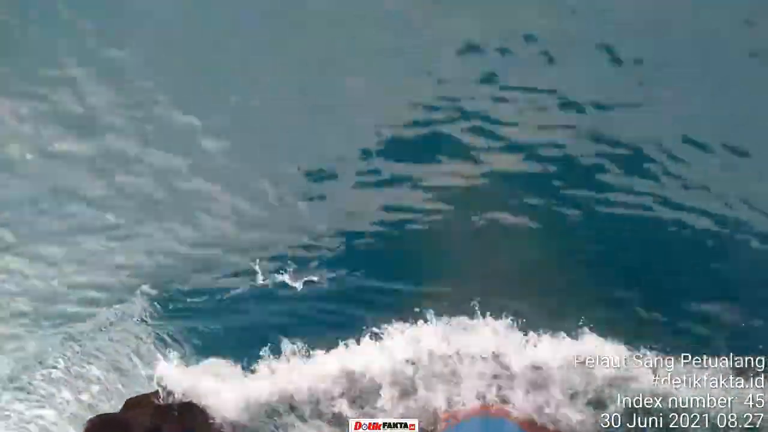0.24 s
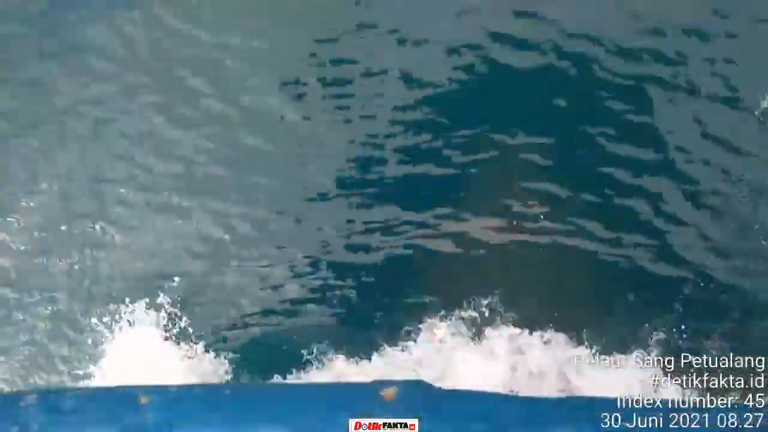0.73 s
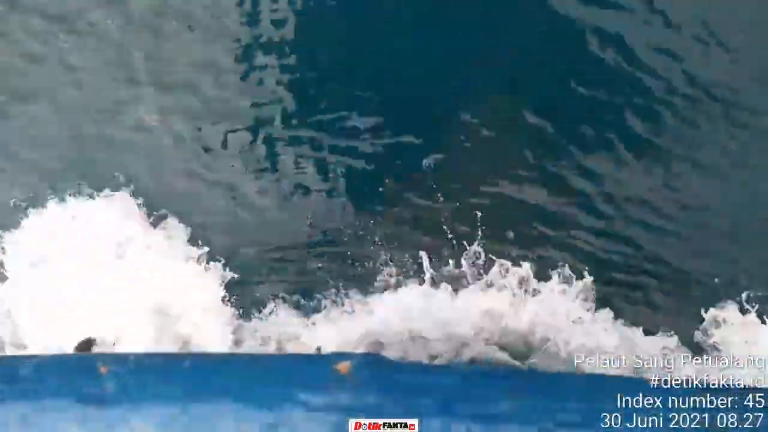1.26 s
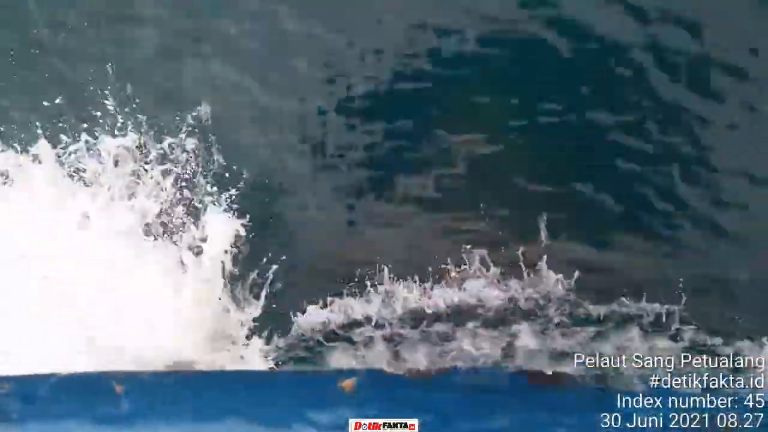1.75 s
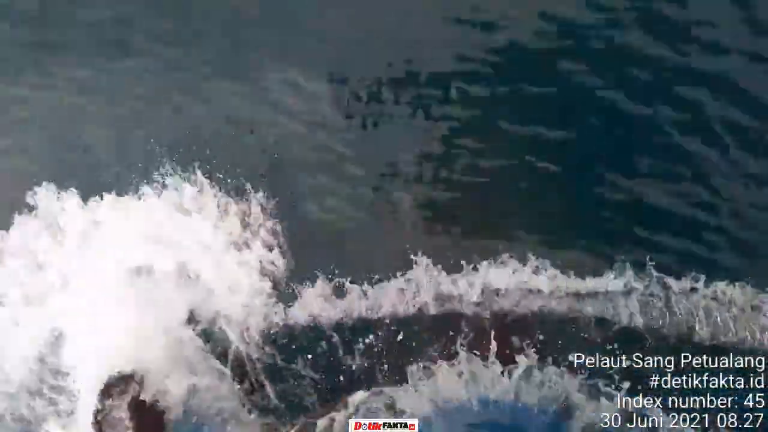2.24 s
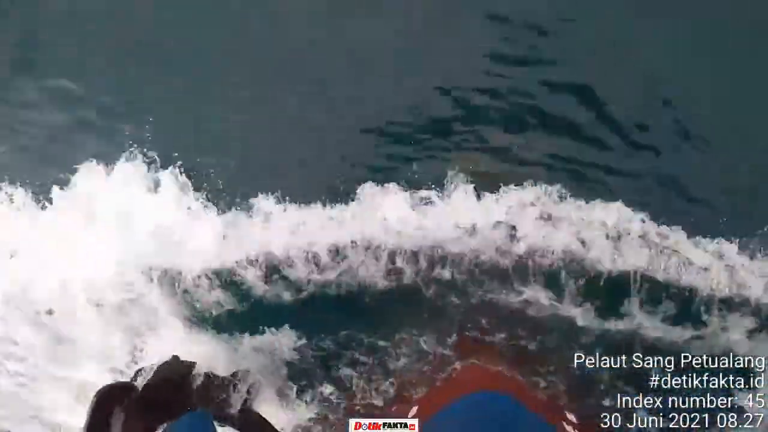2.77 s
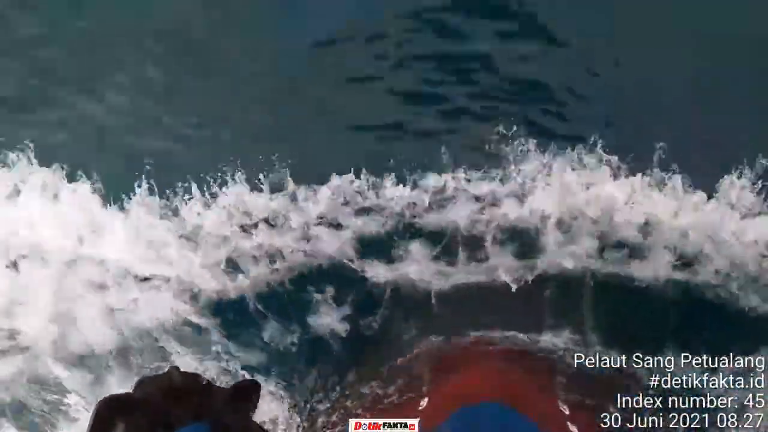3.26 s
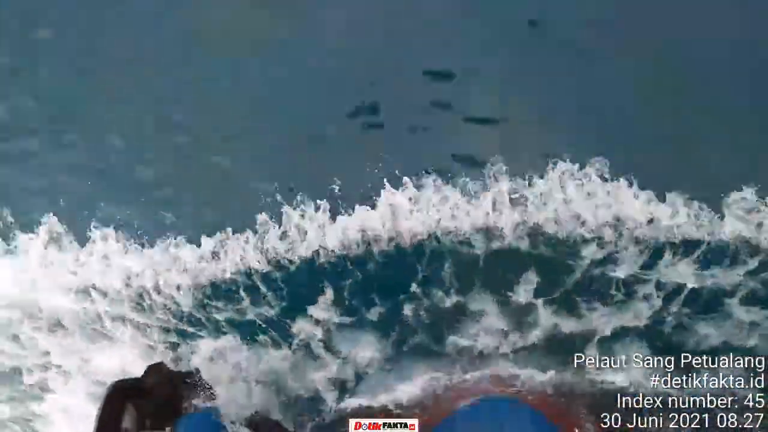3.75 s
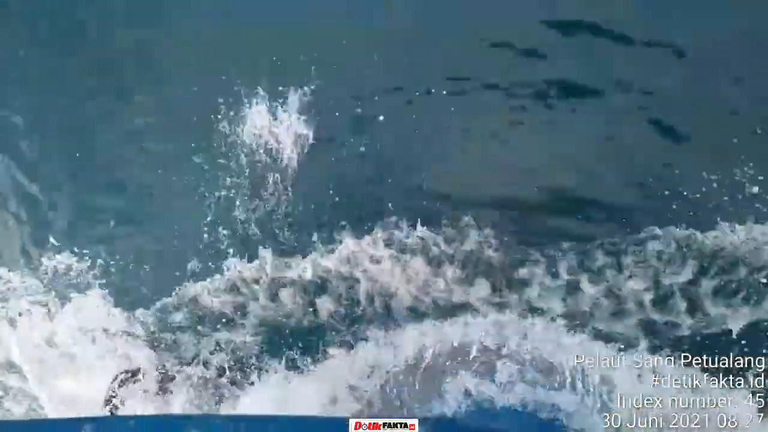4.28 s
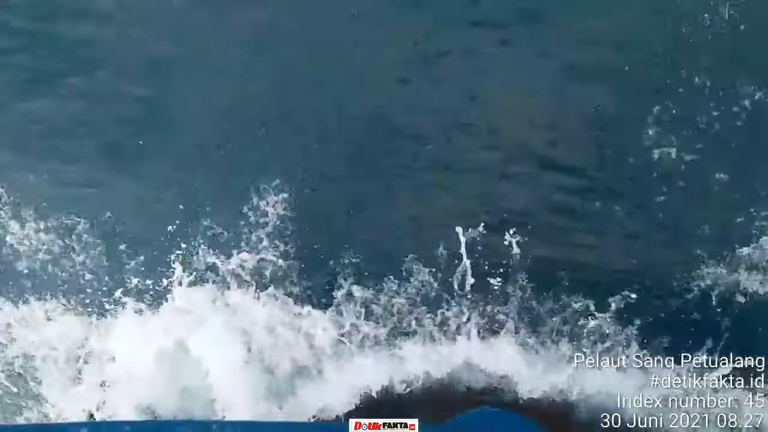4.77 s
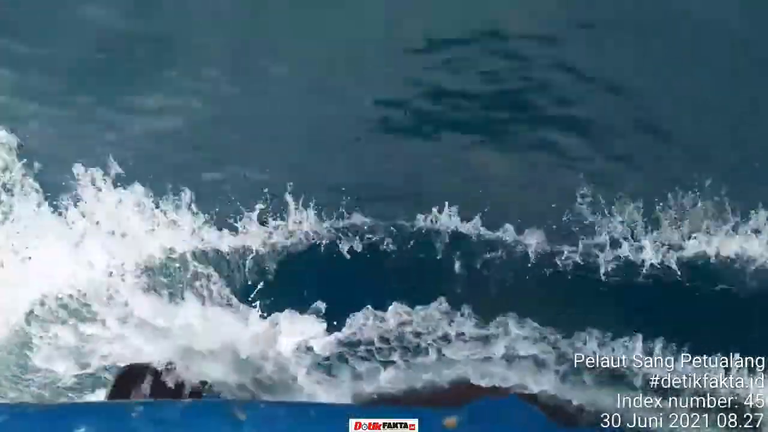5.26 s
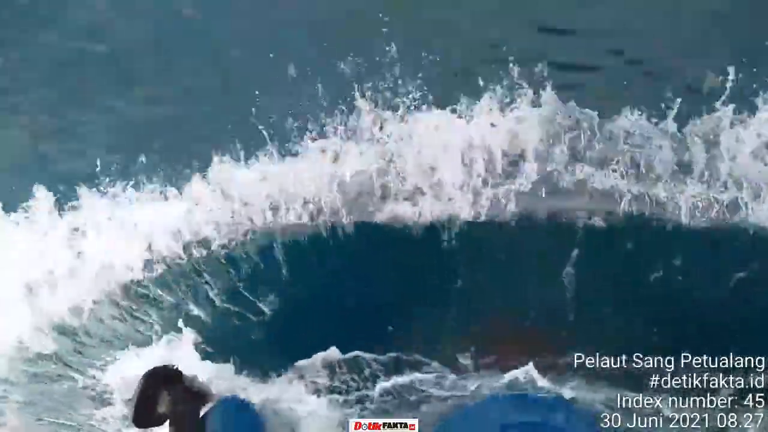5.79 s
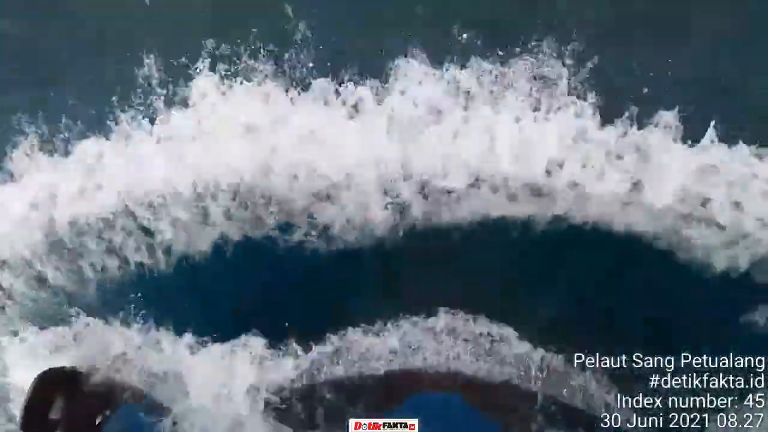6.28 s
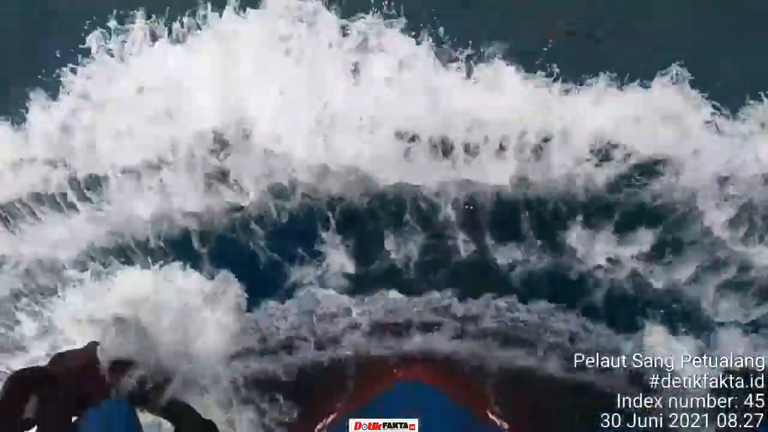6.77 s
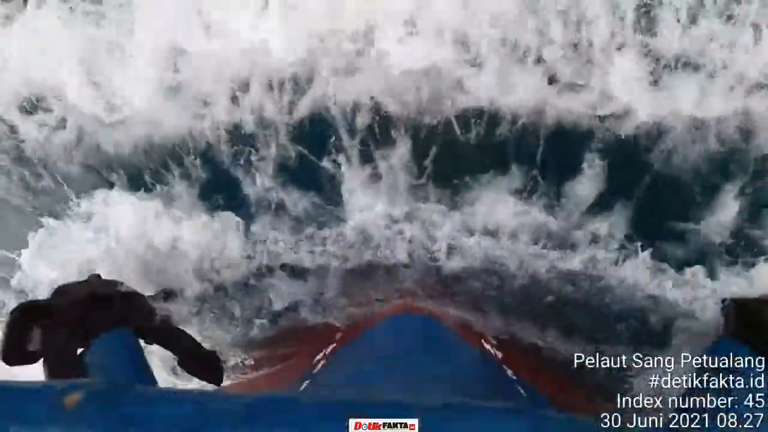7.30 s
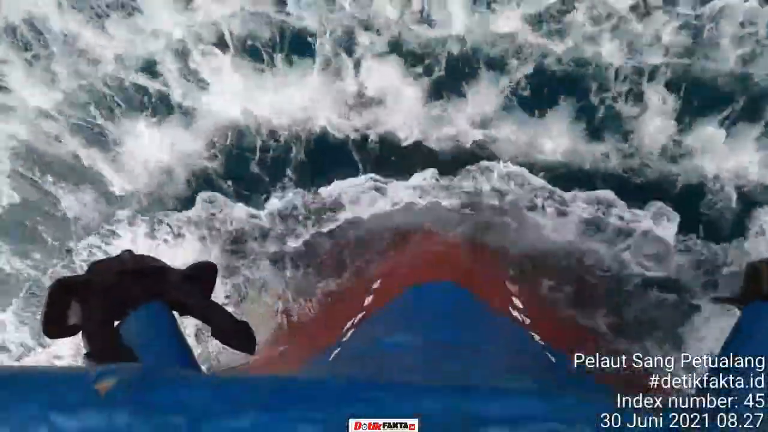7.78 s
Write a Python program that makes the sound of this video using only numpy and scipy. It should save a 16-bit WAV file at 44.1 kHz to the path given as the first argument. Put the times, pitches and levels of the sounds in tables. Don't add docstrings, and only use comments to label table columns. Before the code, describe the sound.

Outdoors at a ship's bow, heard from the rail above the water. Throughout, foamy seawater churns and rushes, mostly low-middle slosh with softer spray hiss, flecked with bubbles and plops. Wind presses on the microphone as deep uneven rumble, thuds and flaps; a steady low engine hum lies below. At about 1 s a round gulp stands out; the wash swells near 1.2 s and again by 3 s. Sharp buffets thump from 2.8 to 3.5 s, then water and wind ease, leaving clustered gurgles at 3.7-3.9 s. Water surges from 4.3 s, with buffets around 4.5 s and tiny drops on the rail. Near 5.2 s a small metal fitting rattles briefly, high and faint. Spray is fullest and brightest around 6 s, gulping until 6.7 s. From 7.6 s the wash thins while strong buffets thud and a fainter metallic chatter returns.

```python
import sys
import numpy as np
from scipy import signal
from scipy.fft import rfft, irfft
from scipy.io import wavfile
from scipy.ndimage import uniform_filter1d

SR = 44100
rng = np.random.default_rng(int(sys.argv[2]) if len(sys.argv) > 2 else 0)


def wav_out(sig):
    wavfile.write(sys.argv[1], SR, np.round(np.clip(np.atleast_2d(sig).T, -1, 1) * 32767).astype(np.int16))


def ratio_of_db(decibels):
    return 10 ** (np.asarray(decibels, float) / 20)


N = 354110

# [t/s, vigour/dB, fineness/dB]
BOW_DRIVE = [(0.0, -3, -0.8), (0.35, -0.7, -0.8), (0.85, -1, -1.2), (1.2, 1, -0.5), (1.7, -2.5, -1),
             (2.25, -0.5, -1.5), (3.0, 0.55, -0.4), (3.3, -3.5, 0.8), (3.6, -5, 0.1), (4.1, -2, -0.5),
             (4.45, 1.5, -0.4), (5.0, -0.1, -1.4), (5.55, -1, 1.8), (5.95, 2, 2), (6.75, 0, 1.1),
             (7.1, 1, 1.5), (7.6, -2.5, 1.2), (8.03, -4.5, 2.5)]
# [f/Hz, density/dB per Hz]
WATER_COLOUR = [(120, -13), (200, 0), (250, -0.5), (430, 2.5), (630, 0), (780, -8.5), (1320, -9.5),
                (1480, -12), (2700, -13.5), (3300, -17.5), (4200, -30), (5900, -27), (7500, -41.5),
                (10000, -49.5), (13000, -66)]
WATER_SPLITS = [740, 1700, 3900, 7300]
# [centre f/Hz, usual level/dB, share of vigour/1, share of fineness/1]
WATER_RANGES = [
    (450, -43.5, 1.12, -1.15),
    (1100, -50, 1.1, -0.36),
    (2600, -50, 1.23, -0.08),
    (5400, -64, 1.28, 0.95),
    (9000, -78.5, 1.6, 2),
]
# [t/s, surge level/dB, half length/s, splash centre f/Hz]
CRESTS = [(0.19, 5.5, 0.033, 1500), (0.66, 3.5, 0.04, 12000), (1.003, 2.5, 0.05, 7000),
          (1.06, 3, 0.042, 450), (1.433, 2.5, 0.095, 1500), (1.874, 3, 0.12, 12000), (2.072, 6, 0.11, 7000),
          (2.643, 4, 0.064, 12100), (3.07, 2.5, 0.13, 2500), (3.47, 3.5, 0.036, 450),
          (3.684, 5, 0.042, 4000), (3.88, 7.5, 0.09, 1490), (4.284, 2, 0.08, 7000), (4.6, 4, 0.073, 12000),
          (4.737, 7, 0.093, 12000), (4.812, 2.5, 0.04, 12000), (5.05, 2.6, 0.075, 1500),
          (5.224, 5.5, 0.095, 250), (5.22, 6, 0.064, 12000), (5.32, 2.5, 0.06, 12000),
          (5.93, 2, 0.04, 12000), (6.42, 3, 0.28, 800), (6.96, 2.5, 0.15, 12000), (7.016, 3.5, 0.11, 250),
          (7.41, 2, 0.04, 250), (7.67, 6, 0.027, 250), (7.762, 2.5, 0.06, 12000), (7.9, 4, 0.098, 250)]
CREST_OCTAVES = 2.33
# [t/s, level change/dB, half length/s, centre f/Hz]
SMALL_SURGES = [(0.38, -5, 0.044, 350), (0.469, 2.0, 0.035, 2600), (0.8, 6, 0.018, 350), (0.888, -3, 0.035, 1100),
                (1.098, 2, 0.06, 4000), (1.213, -3.5, 0.048, 600), (1.616, 2.5, 0.02, 1100),
                (1.796, 3.5, 0.032, 5400), (1.946, -1, 0.17, 350), (2.135, 1, 0.039, 1700),
                (2.373, 2.5, 0.06, 1700), (3.352, -3, 0.24, 350), (3.402, 2.5, 0.16, 2600),
                (3.624, -3.5, 0.032, 600), (3.854, -4, 0.092, 350), (3.895, -6, 0.017, 1690),
                (4.104, -4, 0.029, 600), (4.77, -5.5, 0.03, 350), (4.935, 2, 0.06, 1700), (5.248, -2, 0.11, 5400),
                (5.373, 3.1, 0.14, 1100), (5.567, -1.2, 0.14, 4000), (5.657, 2.3, 0.14, 1100),
                (6.685, 2, 0.02, 2600), (6.783, -1.7, 0.06, 1100), (6.866, 5.5, 0.024, 350),
                (7.713, -1.5, 0.035, 1100), (7.902, -2, 0.06, 1700), (8.022, 2.1, 0.16, 350),
                (2.52, -1, 0.09, 800), (2.78, -1, 0.08, 350), (4.47, 0, 0.06, 300), (1.32, 1, 0.095, 2600),
                (0.6, 1.5, 0.06, 300), (7.27, 0, 0.05, 350), (0.85, 0, 0.06, 2600), (4.66, 1, 0.03, 9000),
                (5.85, -1, 0.04, 9000), (6.05, -2, 0.04, 9000), (4.27, 0, 0.045, 350)]
SMALL_SURGE_OCTAVES = 1.08
# [t/s, peak level/dB, f/Hz]
GULPS = [(0.269, -30, 533), (0.394, -30, 517), (0.796, -31, 620), (1.006, -35, 412), (1.067, -20.5, 590),
         (1.625, -29, 537), (1.82, -28, 470), (2.691, -40, 490), (3.718, -29.5, 426), (3.803, -25, 610),
         (3.816, -27, 540), (3.842, -26.5, 610), (3.85, -29, 620), (3.895, -31, 460), (3.918, -24.5, 500),
         (4.6, -34, 1250), (3.812, -37, 1250), (3.897, -37, 1750), (3.872, -33, 880), (3.858, -38, 2650),
         (4.37, -28, 465), (4.413, -25.5, 584), (4.554, -24, 410), (5.286, -45, 655), (5.64, -43, 479),
         (6.108, -27.5, 580), (6.394, -26, 446), (6.447, -27, 646), (6.512, -26.5, 495), (6.545, -32, 475),
         (6.743, -35, 505), (7.024, -37, 423), (7.272, -48, 571), (7.434, -27, 510)]
# [t/s, peak level/dB, f/Hz]
GLUGS = [(0.105, -35, 366), (0.141, -28, 315), (0.461, -32, 390), (0.947, -31, 336), (0.978, -33, 506),
         (1.666, -34, 393), (2.662, -26, 487), (2.786, -32, 385), (3.007, -32, 455), (3.119, -36, 479),
         (4.227, -29, 393), (4.278, -30, 361), (4.591, -31, 376), (5.799, -39, 398), (5.859, -32, 423),
         (7.195, -31, 468), (7.403, -28, 519), (7.669, -34, 358), (7.905, -33, 463)]
# [t/s, peak level/dB, f/Hz]
PLOPS = [(0.2877, -39, 2340), (0.7627, -41, 2300), (0.7886, -36, 2730), (0.852, -37, 2470),
         (0.9453, -40, 2650), (1.9425, -35, 2430), (2.396, -40, 2470), (2.6673, -36, 1890),
         (3.0066, -37, 2030), (3.0749, -38, 1850), (3.8477, -33, 2320), (3.9669, -39, 1980),
         (4.3335, -38, 1950), (4.814, -35, 2690), (5.4844, -35, 1920), (5.7224, -39, 2090),
         (5.8611, -41, 2480), (5.9614, -31, 1900), (6.129, -36, 2140), (6.2377, -36, 2330),
         (6.5984, -37, 2640), (6.6578, -37, 2320), (6.7705, -37, 2060), (6.9321, -40, 2940),
         (7.1596, -36, 2510)]
# [f/Hz, width f/Hz, level/dB]
PORT_RESONANCE = (9000, 500, 3.6)
# [t/s, peak level/dB]
RAIL_DROPS = [(4.4994, -56), (4.5605, -46), (4.6194, -48), (4.703, -48), (4.7494, -49), (4.815, -46),
              (5.1694, -55), (5.9194, -49), (6.6862, -48)]

# [t/s, strength/dB, smallness of the eddies/dB]
WIND_DRIVE = [(0.0, -2, -1.5), (0.6, -2.5, 2.2), (0.8, 1.5, -5), (1.5, 0.5, -0.5), (2.0, -1.1, -2),
              (2.45, 0.5, 2), (3.2, -4.5, -0.5), (3.6, -12.5, 0), (4.25, -0.5, 1.8), (4.65, 2.6, -2.5),
              (5.1, -2, 7), (5.7, -2.5, 5.5), (6.05, -4, 1.2), (6.5, 1, 1), (7.2, -5, 2), (7.6, -0.5, -0.5),
              (7.85, 5.0, -3.5), (8.03, 4.5, 2)]
# [centre passing rate f/Hz, usual level/dB, share of strength/1, share of smallness/1]
EDDY_SIZES = [
    (12, -30, 1.13, -0.68),
    (51.5, -40.5, 1.14, 0.75),
    (133, -47, 0.95, 0.91),
]
# [f/Hz, density/dB per Hz]
PRESSURE_COLOUR = [(2, -2), (5, 8), (10, 7), (20, -3), (32, -7.5), (60, -33), (200, -74), (1500, -140)]
# [f/Hz, density/dB per Hz]
THUD_COLOUR = [(15, -45), (36, -2.5), (65, -9.5), (95, -12.5), (160, -34.5), (1500, -140)]
# [f/Hz, density/dB per Hz]
FLAP_COLOUR = [(40, -42), (95, -3.5), (140, -2), (220, -8), (400, -21), (800, -40), (4000, -140)]
# [t/s, level change/dB, half length/s, centre f/Hz]
WIND_SURGES = [(0.397, 6, 0.076, 15), (1.423, 10, 0.09, 26), (1.882, 9, 0.029, 180), (2.66, 11, 0.034, 22),
               (2.817, 12.5, 0.043, 69), (2.977, 15, 0.047, 10), (3.015, 11.5, 0.057, 170),
               (3.044, 24, 0.029, 30), (3.123, 1.5, 0.035, 120), (3.3, 14, 0.029, 37), (3.405, 9, 0.034, 8),
               (3.445, 17, 0.021, 160), (3.46, 26, 0.098, 26.5), (3.617, 13.5, 0.12, 53),
               (3.765, 22.5, 0.047, 28.6), (3.86, 12.1, 0.084, 8.9), (3.916, 11.5, 0.057, 160),
               (3.954, 12.5, 0.038, 19), (4.038, 7.5, 0.09, 49), (4.178, 10, 0.048, 23), (4.466, 8.5, 0.052, 140),
               (5.257, 9, 0.08, 36), (5.605, 10, 0.066, 36), (6.14, 13, 0.031, 44), (7.04, 6, 0.075, 80),
               (7.056, 12, 0.06, 7.9), (7.51, 16, 0.039, 7.4), (7.683, 10.5, 0.058, 39), (7.895, 8, 0.1, 43),
               (7.51, -3, 0.04, 50), (7.33, -2.5, 0.06, 70), (0.78, -2, 0.12, 27), (1.2, -2, 0.06, 70),
               (4.6, -2, 0.08, 40), (6.75, -1, 0.11, 25), (1.75, 2.5, 0.15, 23), (0.03, 3, 0.046, 60),
               (0.14, 0, 0.03, 50), (0.399, 4, 0.1, 80), (0.452, -16, 0.047, 200), (0.614, -5, 0.03, 62),
         (1.066, -7, 0.03, 64), (1.098, 5, 0.13, 200), (1.223, -10.9, 0.037, 57), (1.586, 1.5, 0.073, 64),
         (2.05, 3, 0.03, 110), (2.183, -10, 0.03, 35), (2.355, -12, 0.041, 33), (2.52, -7, 0.042, 72),
         (2.937, -10, 0.03, 42), (3.21, -1, 0.028, 50), (3.871, -4, 0.05, 30), (4.312, -11, 0.063, 200),
         (4.36, 2.5, 0.13, 30), (4.366, -11, 0.05, 8), (4.561, 11.5, 0.027, 200), (4.679, 0.5, 0.11, 200),
         (4.764, 4, 0.03, 30), (4.797, -5, 0.14, 8), (4.899, 5, 0.019, 46), (5.817, 4, 0.03, 33),
         (6.126, -14, 0.03, 8), (7.308, 14, 0.04, 26), (7.413, -8, 0.041, 220), (7.514, 2, 0.021, 200),
         (7.553, -2, 0.05, 50), (0.7, -7, 0.12, 40), (0.64, 5, 0.07, 200), (1.22, -3, 0.05, 90),
         (2.3, -1, 0.046, 100), (2.96, 3.5, 0.03, 110), (3.148, 5, 0.04, 92), (4.95, -4, 0.08, 64),
         (5.72, -2.5, 0.12, 35), (5.87, 4, 0.074, 200), (6.87, -5, 0.03, 140), (6.95, 4.5, 0.04, 92),
         (7.49, 2, 0.04, 99), (7.63, -5, 0.035, 45), (7.75, -3, 0.04, 60), (0.35, -2, 0.06, 55),
         (3.43, 5, 0.025, 200)]
WIND_SURGE_OCTAVES = 1.39
# [t/s, peak level/dB, f/Hz, length/s]
BUFFETS = [(2.797, -31, 71.6, 0.041), (2.981, -30, 89, 0.047), (3.034, -24.5, 76, 0.049),
           (3.419, -24, 100, 0.046), (4.418, -26, 72, 0.048), (4.543, -24, 74.7, 0.055),
           (5.512, -33, 123, 0.034), (7.049, -26.5, 142.7, 0.046), (7.668, -19, 90.3, 0.036),
           (7.828, -25, 60.2, 0.045), (7.908, -20, 72.5, 0.036), (7.958, -28, 96, 0.032),
           (0.662, -36, 140, 0.03), (1.331, -36, 70, 0.04), (1.415, -34, 70.6, 0.04),
           (1.615, -32, 140, 0.03), (2.2, -37, 70, 0.04), (2.369, -36, 70, 0.035), (2.413, -35, 102, 0.031),
           (5.78, -28, 82.5, 0.048), (6.12, -30, 70, 0.04), (6.992, -33, 83, 0.03),
           (2.997, -24, 112, 0.025), (7.69, -27, 110, 0.025)]

# [start t/s, level/dB, hold/s, dying away/dB per s]
SHAKES = [
    (5.162, -75, .09, 70),
    (7.64, -79, .14, 70),
]
SHAKE_RISE_S = 0.02
# [t/s, peak level/dB]
HARD_TAPS = [(5.1705, -56), (5.1946, -57), (5.2054, -61), (5.215, -61), (5.2214, -62), (5.232, -59),
             (5.245, -58), (5.2774, -60), (5.3023, -66)]
# [f/Hz, width f/Hz, level/dB]
FITTING_MODES = [(7400, 900, -6), (8270, 220, 1), (8510, 220, 1), (9600, 900, -5), (10600, 500, -4),
                 (11500, 330, -2.5), (11900, 700, -5)]
# [multiple of ENGINE_HZ/1, rms level/dB]
ENGINE_ORDERS = [(1, -45.5), (2, -43), (3, -52.5)]
ENGINE_HZ = 27.9
# [f/Hz, density/dB per Hz]
HISS_COLOUR = [(300, 0), (10000, 0), (15500, 0)]
HISS_DB, HISS_TOP_HZ = -78.5, 15530


def bow_wave():
    bubbles = foam(90, 3.2, 4.63, count=36)
    water = patchy(rng.standard_normal(N) + ratio_of_db(-10.0) * bubbles, 0.24, 0.53)
    range_levels = levels(BOW_DRIVE, WATER_RANGES, (CRESTS, CREST_OCTAVES), (SMALL_SURGES, SMALL_SURGE_OCTAVES))
    edges = [1, *WATER_SPLITS, SR]
    port_hz, port_width_hz, port_peak_db = PORT_RESONANCE
    out = np.zeros(N)
    for level_db, lo, hi in zip(range_levels, edges, edges[1:]):
        def range_gain(f):
            port_db = port_peak_db * np.exp(-((f - port_hz) / port_width_hz) ** 2)
            whole = ratio_of_db(read(WATER_COLOUR, f) + port_db)
            return whole / (1 + (lo / (f + 1)) ** 12) / (1 + (f / hi) ** 12)
        out += ratio_of_db(level_db) * colour(water, range_gain)
    # table, trim dB, ringing cycles, upward glide
    for pockets, trim_db, cycles, glide in [(GULPS, 0.5, 4.7, 0.013), (GLUGS, 0.5, 3.5, 0.03),
                                            (PLOPS, 3.0, 6.5, 0.02)]:
        for s, db, hz in pockets:
            add(out, s, ratio_of_db(db + trim_db) * bubble(hz, cycles, glide))
    return out


def foam(per_s, spread_db, cycles, count):
    out = np.zeros(N)
    for hz in np.geomspace(260, 9500, count):
        bursts = rng.random(N) < per_s * hz / 2000 / SR
        size = ratio_of_db(spread_db * np.minimum(rng.exponential(1, N), 4))
        out += signal.oaconvolve(bursts * size, bubble(hz, cycles, 0.048))[:N] * np.sqrt(hz)
    return unit(out)


def bubble(hz, cycles, glide):
    u = np.arange(round(3 * cycles / hz * SR)) * hz / cycles / SR
    tone = np.sin(2 * np.pi * cycles * (u + glide * u ** 2))
    return tone * (1 - np.exp(-u / 0.19)) * np.exp(-2.0 * u)


def patchy(x, patch_db, flicker_db):
    z = signal.stft(x, nperseg=512, noverlap=384)[2]
    patches = rng.standard_normal(z.shape[::-1]).T
    patches = uniform_filter1d(patches, size=8, axis=0)
    patches = unit(uniform_filter1d(patches, size=24, axis=1))
    slaps = unit(uniform_filter1d(rng.standard_normal(z.shape[1]), size=8))
    z = z * ratio_of_db(patch_db * patches + flicker_db * slaps)
    return signal.istft(z, nperseg=512, noverlap=384)[1][:N]


def drops():
    out, t = np.zeros(N), np.arange(SR // 40) / SR
    for s, db in RAIL_DROPS:
        spatter = rng.standard_normal(len(t)) * np.exp(-t / 0.004)
        add(out, s, ratio_of_db(db + 2.5) * spatter)
    return bandpass(out, 3800, 6900)


def wind():
    pressure_db, thud_db, flap_db = levels(WIND_DRIVE, EDDY_SIZES, (WIND_SURGES, WIND_SURGE_OCTAVES))
    lumps_db = 2.56 * wander(23)
    out = ratio_of_db(pressure_db) * eddies(PRESSURE_COLOUR, 0.029, 1.0)
    out += ratio_of_db(thud_db - 1.5) * eddies(THUD_COLOUR, 0.028, 0.95)
    out += ratio_of_db(flap_db - 0.6 + lumps_db) * eddies(FLAP_COLOUR, 0.024, 0.54)
    for s, db, hz, length_s in BUFFETS:
        add(out, s - 0.004, ratio_of_db(db - 10.5) * buffet(hz, length_s))
    return out


def eddies(spectrum, window_s, evenness):
    x = colour(rng.standard_normal(N), lambda f: ratio_of_db(read(spectrum, f)))
    width = round(window_s * SR)
    strength = uniform_filter1d(uniform_filter1d(x ** 2, width), width)
    return unit(x / (strength + 0.05) ** (evenness / 2))


def buffet(hz, length_s):
    t = np.arange(SR // 8) / SR
    falling = hz * t * (1 - 2.04 * t)
    snaps = sum(np.cos(2 * np.pi * k * falling) / k ** 1.14 for k in range(1, 7))
    puff = bandpass(rng.standard_normal(len(t)), 60, 380)
    u = np.minimum(t / max(length_s, 0.01), 1)
    return (unit(snaps) + 0.27 * unit(puff)) * np.sin(np.pi * u ** 0.85) ** 2


def fitting():
    taps, t = np.zeros(N), np.arange(SR // 25) / SR
    now = np.arange(SR // 2) / SR
    for s, db, hold_s, fall_db in SHAKES:
        knocks = rng.standard_normal(len(now)) * (rng.random(len(now)) < 1500 / SR)
        dying = ratio_of_db(db + 14.0 - fall_db * np.maximum(now - hold_s, 0))
        add(taps, s, np.minimum(now / SHAKE_RISE_S, 1) * dying * knocks)
    for s, db in HARD_TAPS:
        add(taps, s, ratio_of_db(db - 4.0) * rng.standard_normal(len(t)) * np.exp(-t / 0.0047))
    ring = sum(ratio_of_db(db) * np.exp(-np.pi * width_hz * t) * np.sin(2 * np.pi * hz * t)
               for hz, width_hz, db in FITTING_MODES)
    ring = ring * (1 - np.exp(-t / 0.0002))
    return ratio_of_db(-13.5) * signal.oaconvolve(taps, ring)[:N]


def engine():
    turns = np.cumsum(ENGINE_HZ * (1 + 0.001 * wander(0.3))) / SR
    out = np.zeros(N)
    for k, db in ENGINE_ORDERS:
        level = ratio_of_db(db + 1.1 * wander(0.5)) * np.sqrt(2)
        out += level * np.sin(2 * np.pi * (k * turns + rng.random()))
    return out


def preamp_hiss():
    noise = rng.standard_normal(N)
    return ratio_of_db(HISS_DB + 3.0) * colour(noise, lambda f: ratio_of_db(read(HISS_COLOUR, f)) * (f < HISS_TOP_HZ))


def levels(control, layers, *surges):
    strength, tilt = curves(control)
    return [usual + a * strength + b * tilt + sum(surge(*kind, hz) for kind in surges)
            for hz, usual, a, b in layers]


def surge(rows, octaves, hz):
    s, db, half_s, centre = np.transpose(rows)[:, :, None]
    coarse = np.arange(0, N, 64) / SR
    in_time = ((coarse - s) / np.maximum(half_s, 0.01)) ** 2
    in_pitch = (np.log2(hz / centre) / octaves) ** 2
    bells = db * np.exp(-in_time - in_pitch)
    return np.interp(np.arange(N) / SR, coarse, bells.sum(0))


def curves(rows):
    s, *columns = np.transpose(rows)
    return [uniform_filter1d(np.interp(np.arange(N) / SR, s, c), size=600) for c in columns]


def wander(hz):
    return colour(rng.standard_normal(N), lambda f: (f > 0) / (1 + (f / hz) ** 2))


def colour(x, gain):
    return unit(irfft(rfft(x) * gain(np.fft.rfftfreq(N, 1 / SR)), N))


def bandpass(x, lo_hz, hi_hz):
    return signal.sosfilt(signal.butter(3, [lo_hz, hi_hz], "bandpass", fs=SR, output="sos"), x)


def read(points, hz):
    f, value = np.transpose(points)
    return np.interp(np.log(hz + 1), np.log(f + 1), value)


def unit(x):
    return x / np.sqrt(np.mean(x ** 2) + 1e-20)


def add(mix, s, sound):
    part = mix[round(s * SR):][:len(sound)]
    part += sound[:len(part)]


def scene():
    return (bow_wave() + drops() + wind() + fitting() + engine())[None]


def low_pass(x):
    return signal.sosfilt(signal.butter(12, 15710, fs=SR, output="sos"), x)


def record(dry):
    from_end = np.minimum(np.arange(N), N - np.arange(N))
    fade = np.sin(np.pi / 2 * np.minimum(from_end / 200, 1)) ** 2
    return low_pass((dry + preamp_hiss()) * fade)


dry = scene()
out = record(dry)
wav_out(out)
```